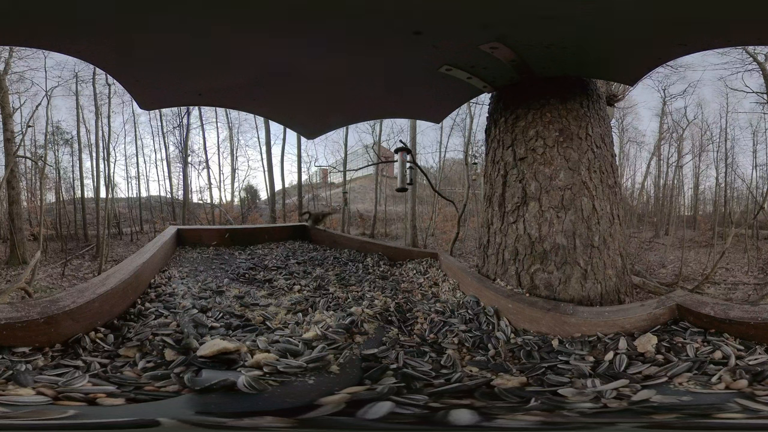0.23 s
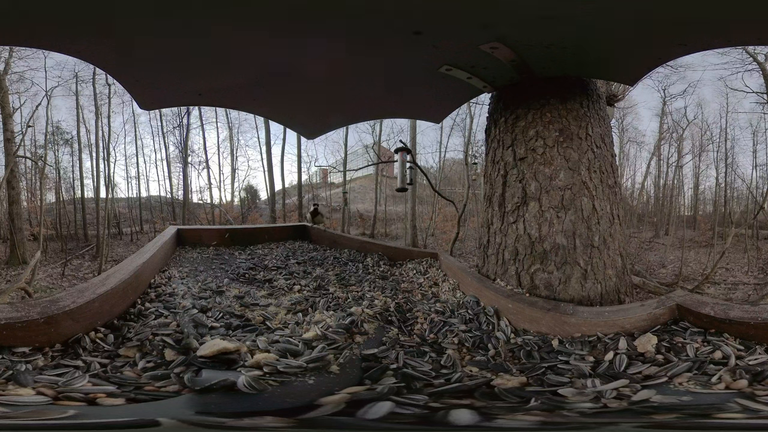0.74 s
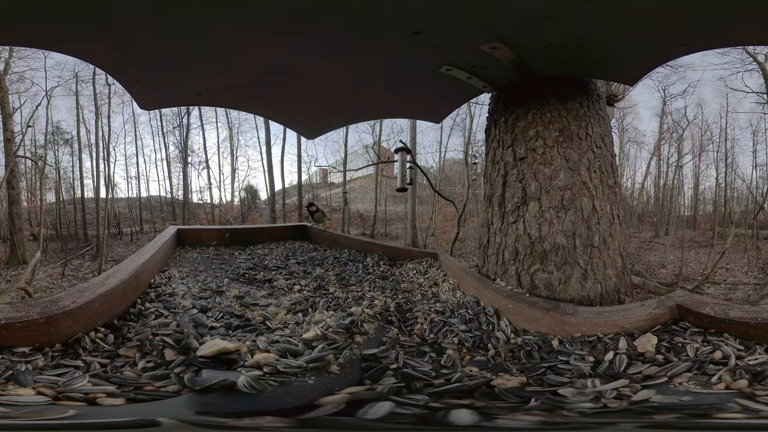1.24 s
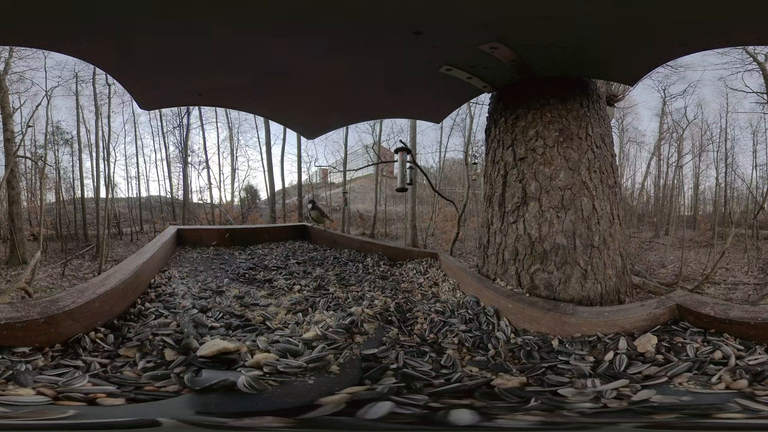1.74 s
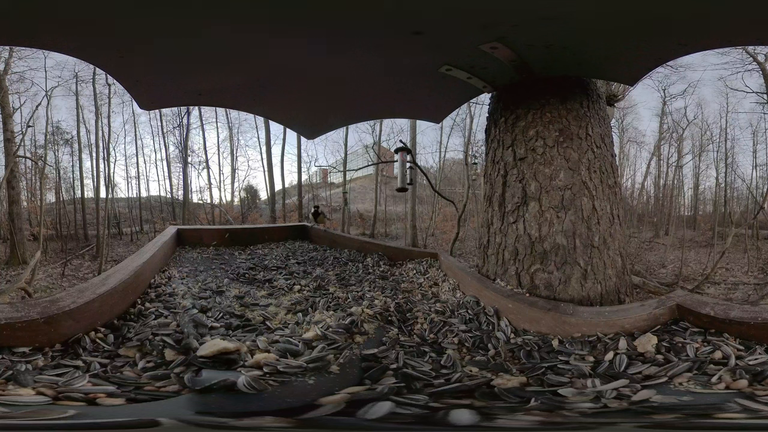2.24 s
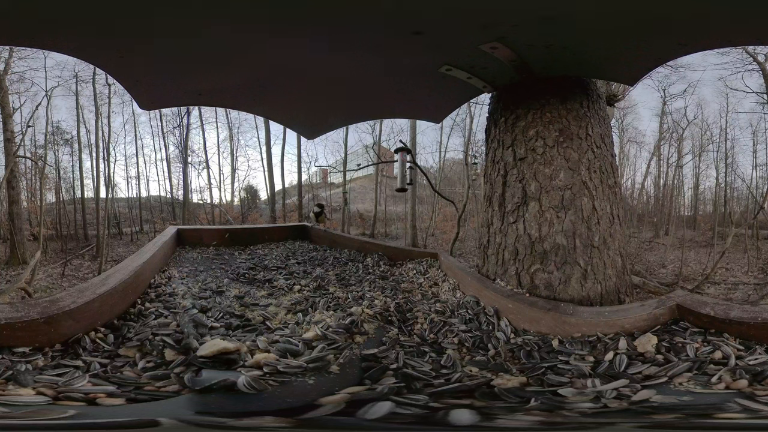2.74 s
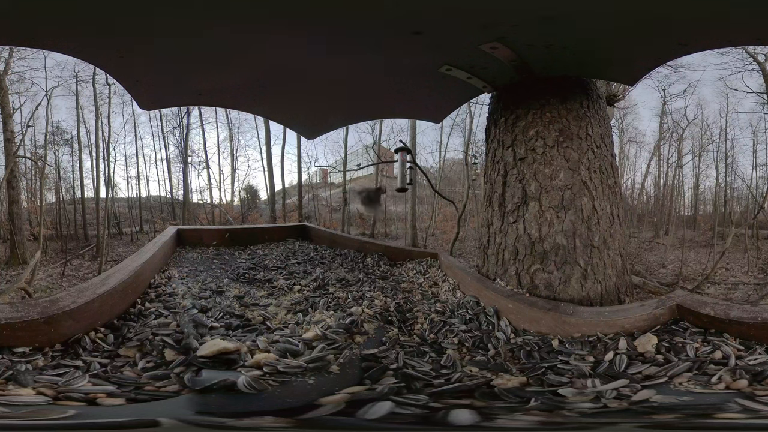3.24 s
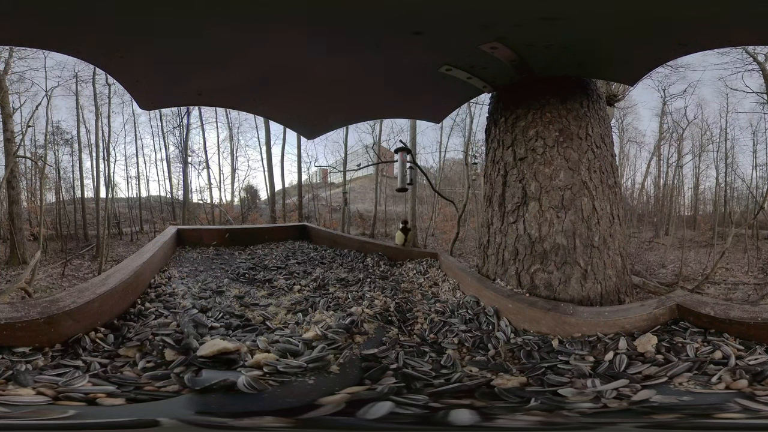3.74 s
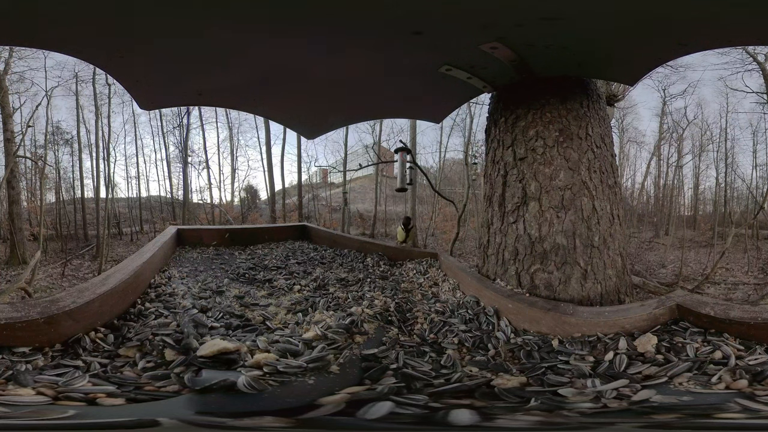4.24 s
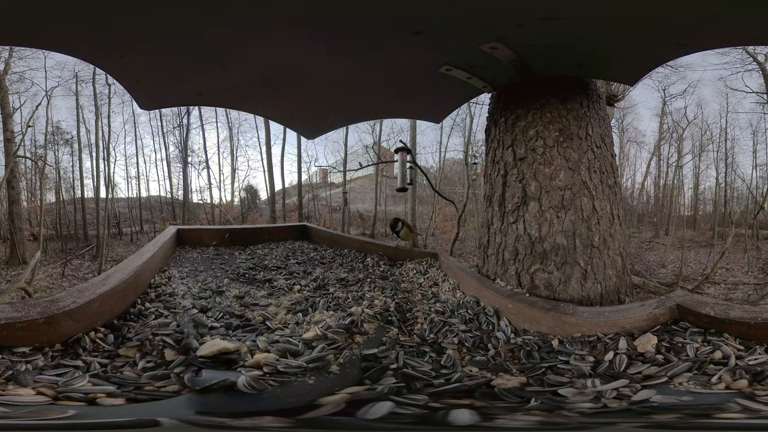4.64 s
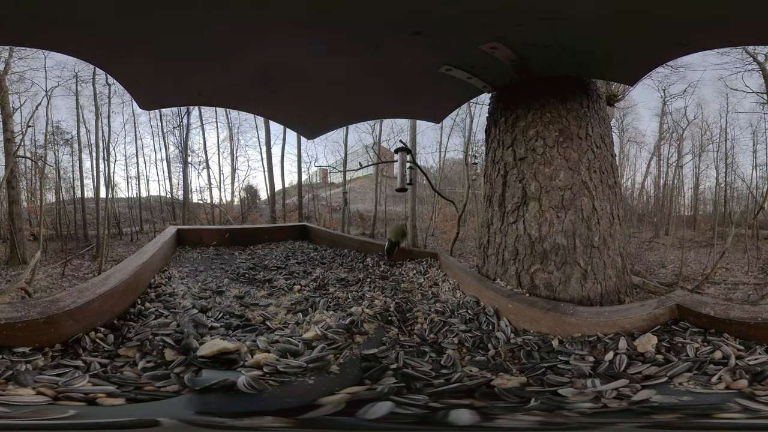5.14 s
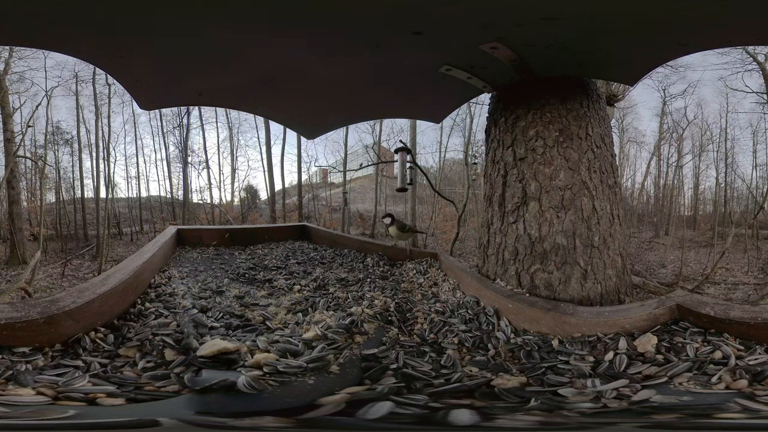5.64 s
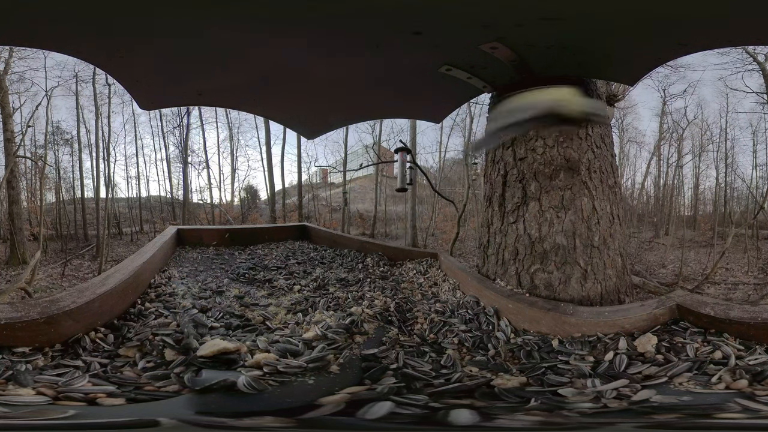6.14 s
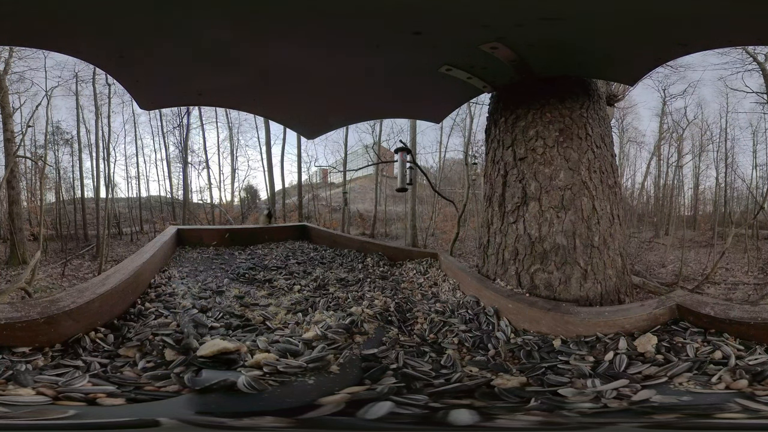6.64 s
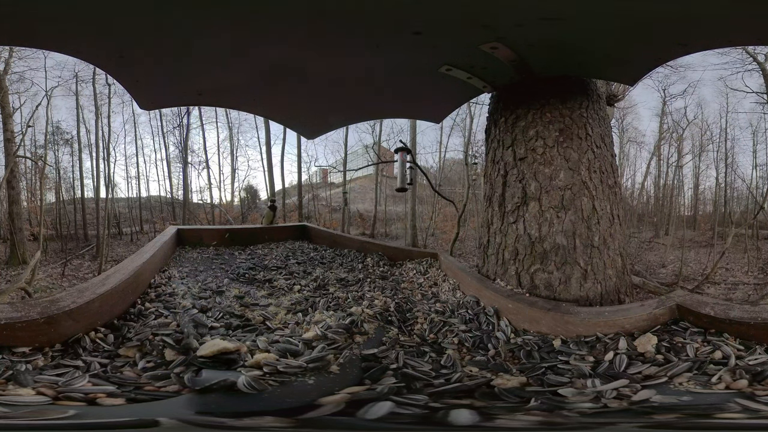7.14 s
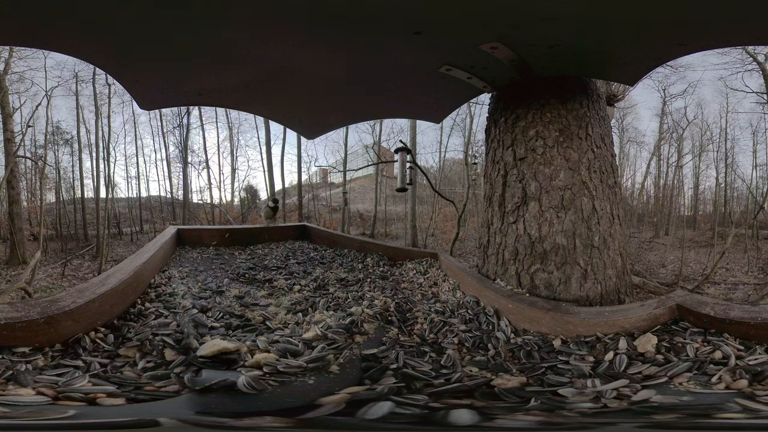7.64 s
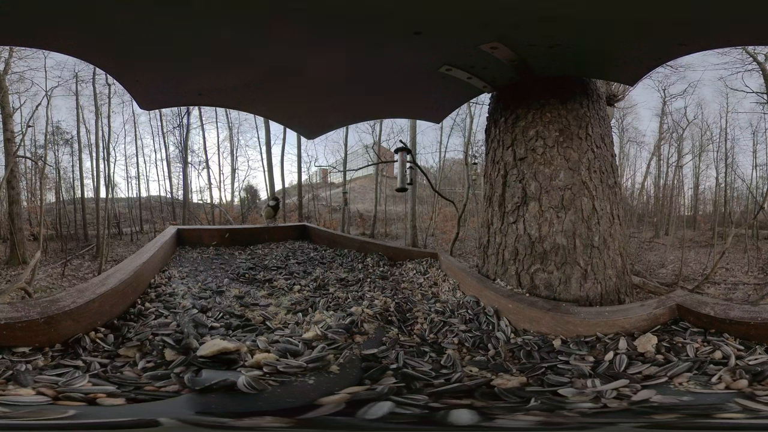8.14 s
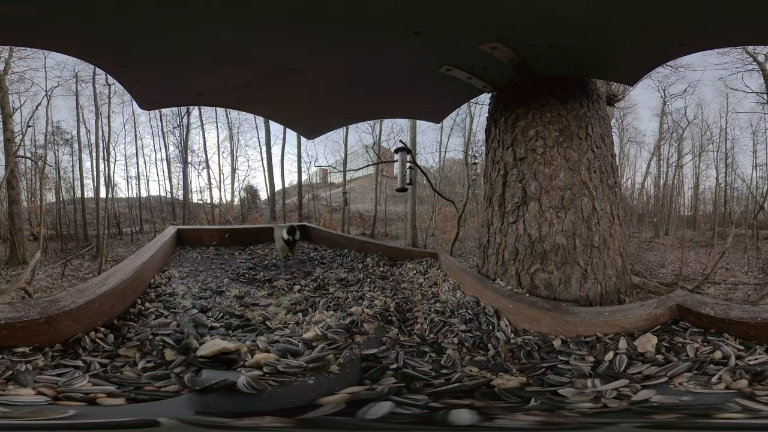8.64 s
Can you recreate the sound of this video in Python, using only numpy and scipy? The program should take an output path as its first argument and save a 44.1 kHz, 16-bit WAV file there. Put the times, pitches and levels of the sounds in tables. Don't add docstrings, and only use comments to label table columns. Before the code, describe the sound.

Small birds feed right beside a stereo microphone. Crisp seed cracks and faint high chips open the scene, with a faint rising machine whine far away. Wings flutter, buffet the microphone, and claws scrape and tap the hollow wooden rim. After another departing wing burst, a bird lands with a loud knock while tyres rumble on a distant road. The low woodland hum pumps as if gated, slightly stronger on the right.

```python
import sys
import numpy as np
from scipy import signal
from scipy.fft import rfft, irfft, next_fast_len
from scipy.io import wavfile
from scipy.ndimage import uniform_filter1d, map_coordinates

SR = 44100
rng = np.random.default_rng(int(sys.argv[2]) if len(sys.argv) > 2 else 0)


def nominal_scale(level):
    x = np.asarray(level, float) / 20
    return 10 ** x


def output_pcm(signal):
    pcm = np.clip(np.atleast_2d(signal).T, -1, 1) * 32767
    wavfile.write(sys.argv[1], SR, np.round(pcm).astype(np.int16))


N = 392490


def unit(x):
    return x / np.sqrt(np.mean(x ** 2) + 1e-20)


def along(points, hz):
    f, v = np.transpose(points)
    return np.interp(np.log(hz + 1), np.log(f + 1), v)


def curves(rows, outside=None):
    s, *cols = np.transpose(rows)
    return [np.interp(np.arange(N) / SR, s, c, outside, outside) for c in cols]


def wobble(rate_hz):
    at = np.arange(0, N + SR // rate_hz, max(SR // (8 * rate_hz), 1))
    knots = rng.standard_normal(int(N * rate_hz / SR) + 4)
    return np.interp(np.arange(N), at, map_coordinates(knots, [at * rate_hz / SR]))


def tone(hz):
    return np.sin(2 * np.pi * np.cumsum(hz) / SR)


def filtered(x, response):
    m = next_fast_len(N + 4096, real=True)
    return irfft(rfft(x, m) * response(np.fft.rfftfreq(m, 1 / SR)), m)[..., :N]


def coloured(x, spectrum, top_hz=SR / 2):
    white_gain = np.sqrt(np.mean(nominal_scale(along(spectrum, np.arange(SR // 2))) ** 2))
    return filtered(x, lambda hz: nominal_scale(along(spectrum, hz)) / white_gain * (hz < top_hz))


def rush(spectrum, alike, patchy_db):
    z = signal.stft(rng.standard_normal((2, N)), nperseg=512)[2]
    field = uniform_filter1d(rng.standard_normal(z.shape[1:]), size=6, axis=0)
    field = uniform_filter1d(field, size=10, axis=1)
    pair = signal.istft(z * nominal_scale(patchy_db * unit(field)), nperseg=512)[1][:, :N]

    def mid_side(hz):
        turn = np.arccos(np.clip(along(alike, hz), -1, 1)) / 2
        return nominal_scale(along(spectrum, hz)) * [np.cos(turn), np.sin(turn)]

    mid, side = filtered(pair, mid_side)
    return unit(np.array([mid + side, mid - side]))


def splinters(own, grain_db):
    grains = nominal_scale(grain_db * wobble(2000))
    return unit(grains * (rng.standard_normal(N) + own * rng.standard_normal((2, N))))


def add(track, s, sound):
    part = track[..., round(s * SR):][..., :sound.shape[-1]]
    part += sound[..., :part.shape[-1]]


# (fully open [s], rise [s], hold [s], hum [dB], hiss re hum [dB])
GATE = [(.13, .1, .02, -62, -9), (.152, .008, 0, -53, -12), (.301, .012, .08, -54, -13.5),
        (.517, .015, .12, -55, -14), (.728, .06, .09, -55.5, -12.5), (1.056, .008, .26, -56, -15),
        (1.507, .01, .3, -55, -15.5), (2.02, .18, .015, -54.5, -13.5), (2.279, .01, .27, -54, -13),
        (2.848, .1, .27, -66.5, -15.5), (3.117, .02, .01, -55.5, -11.5), (3.211, .05, .63, -55, -8.5),
        (3.913, .01, .16, -55.5, -14), (4.26, .15, .02, -62.5, -14), (4.586, .16, .02, -54.5, -14),
        (5.236, .03, .31, -53.5, -12.5), (5.986, .005, 0, -61, -9), (6.1, .05, .03, -63, -9),
        (6.164, .04, .08, -54, -7), (6.27, .01, .05, -54.5, -19), (6.5, .13, .07, -52, -16),
        (6.6, .01, .15, -56, -17), (6.763, .01, 2.2, -52.5, -13.8), (8.774, .05, .01, -56, 1)]
SAG_DB_PER_S, RELEASE_DB_PER_S = 2.5, 95


def gate(shut_db, under):
    t, level = np.arange(0, N, 32) / SR, shut_db
    for s, rise, hold, db, hiss_db in GATE:
        top = db + under * hiss_db
        rising = top - (top - shut_db) * (s - t) / max(rise, .002)
        falling = top - SAG_DB_PER_S * (t - s) - RELEASE_DB_PER_S * np.clip(t - s - hold, 0, None)
        level = np.maximum(level, np.where(t < s, rising, falling))
    return np.interp(np.arange(N) / SR, t, level)


# (time [s], level [dB])
CAR = [(6.75, 0), (6.77, 8), (6.86, 4), (7.07, 6.5), (7.23, 4), (7.42, 2), (7.67, 6.5), (7.8, 3),
       (8.13, 7.5), (8.38, 6), (8.52, 1), (8.66, 6)]


def hum_level_db():
    return gate(shut_db=-70, under=0) + curves(CAR)[0]


# (frequency [Hz], correlation [0-1])
ALIKE = [(60, 0.55), (150, 0.29), (380, 0.62), (950, 0.79), (2380, 0.15), (5980, 0.73), (15000, 0.94)]
# (frequency [Hz], level [dB per Hz])
HISS = [(3200, -49.5), (5500, -18.5), (7500, -12.5), (9300, -0.5), (11500, 0.5), (13700, -2), (15800, -6),
        (16200, -7)]


def hiss():
    level_db = gate(shut_db=-86, under=1) + .6 + .9 * wobble(90)
    return nominal_scale(level_db) * rush(HISS, ALIKE, patchy_db=1.1)


def car_nearness():
    from_s, full_s = 6.48, 6.99
    return np.clip((np.arange(N) / SR - from_s) / (full_s - from_s), 0, 1)


# (frequency [Hz], level [dB per Hz])
RUMBLE = [(12, -40.5), (20, -14.5), (35, -6), (48, 3), (120, -5.5), (160, -36), (260, -120)]


def rumble():
    level_db = hum_level_db() + 1.1 - 3.7 * car_nearness() + 2.4 * wobble(6.7)
    return nominal_scale(level_db) * rush(RUMBLE, [(30, 0.32)], patchy_db=-0.1)


# (time [s], frequency [Hz], level [dB])
WHINE = [(1.0, 1440, -99), (1.6, 1486, -90), (2.2, 1552, -89), (3.1, 1610, -89), (3.3, 1620, -110)]


def whine():
    hz, db = curves(WHINE, outside=-120)
    return nominal_scale(db + hum_level_db() + 68) * tone(hz)


# (frequency [Hz], level [dB per Hz])
HUM = [(65, -40), (110, -5.5), (250, 0.5), (456, -4), (1040, -12), (1890, -24), (4020, -32), (4830, -37),
       (5340, -44), (6000, -43), (7800, -53), (13200, -120)]
# (frequency [Hz], level [dB per Hz])
TYRES = [(65, -25), (110, 1.5), (139, -7.5), (222, -3), (337, -1.5), (472, -8), (729, -4.5), (900, -8.5),
         (1470, -12.5), (2400, -21), (3800, -30), (4800, -38.5), (6000, -48.5), (7800, -76), (13200, -120)]


def hum_and_tyres():
    car = car_nearness()
    woods = np.sqrt(1 - car) * rush(HUM, ALIKE, patchy_db=2.5)
    roar = np.sqrt(car) * rush(TYRES, ALIKE, patchy_db=1.6)
    return nominal_scale(hum_level_db() + 3.0 + .7 * wobble(23)) * (woods + roar)


# (time [s], firing frequency [Hz], level [dB])
ENGINE = [(6.4, 67.4, -64), (6.55, 69.1, -49), (6.7, 69.2, -64), (6.8, 69.3, -56), (6.98, 69.4, -60),
          (7.05, 77.3, -64), (7.23, 68.6, -53.5), (8.9, 67.9, -55.5)]


def engine():
    hz, db = curves(ENGINE, outside=-120)
    return nominal_scale(db + 4.0 + 3.2 * wobble(13)) * tone(hz * (1 + .04 * wobble(12)))


# (time [s], length [s], start [Hz], end [Hz], level [dB])
CHIPS = [
    (0.706, 0.018, 6600, 6100, -63),
    (.729, 0.018, 5650, 5100, -65),
    (1.7, .065, 4480, 4570, -78),
    (1.745, .085, 4570, 4470, -78),
    (1.94, 0.12, 4530, 4400, -78),
    (4.611, 0.019, 3870, 3850, -68),
    (4.628, 0.01, 3830, 1800, -65),
]


def far_birds():
    out = np.zeros(N)
    blur = 1 + .007 * wobble(150)
    for s, length, start_hz, end_hz, db in CHIPS:
        u = np.linspace(0, 1, round(length * SR))
        hz = (start_hz + (end_hz - start_hz) * u) * blur[round(s * SR):][:len(u)]
        add(out, s, nominal_scale(db + 7.5) * np.sin(np.pi * u) ** 2 * tone(hz))
    decay_s = .025
    echo = np.exp(-np.arange(SR // 10) / (decay_s * SR)) * rng.standard_normal(SR // 10)
    wet = signal.fftconvolve(out, echo / np.linalg.norm(echo))[:N]
    return out * nominal_scale(3 * wobble(90)) + nominal_scale(-13.0) * wet


EXPOSURE = nominal_scale([[-1.5], [1.5]])
# (peak time [s], peak level [dB], 20 dB swell [s], 20 dB fade [s])
GUSTS = [
    (3.32, -21, .032, .04),
    (3.39, -38, .2, .07),
    (3.487, -41, .02, .04),
    (3.53, -31, .022, .1),
    (3.68, -32, .085, .07),
    (5.395, -41, .04, .06),
    (6.15, -37, .022, .025),
    (6.216, -25, .028, .045),
]
# (frequency [Hz], level [dB per Hz])
BUFFET = [(15, -34.5), (30, -4), (65, 1.5), (150, -8), (300, -7.5), (600, -16.5), (1200, -32),
          (2500, -39.5), (5000, -76)]


def downwash():
    now = np.arange(N) / SR
    level_db = np.max([db - 20 * np.where(now < s, (s - now) / swell, (now - s) / fade)
                       for s, db, swell, fade in GUSTS], axis=0)
    wash = uniform_filter1d(nominal_scale(level_db - 3.5), size=400)
    swirl = rush(BUFFET, [(30, .9)], patchy_db=3.2)
    steady = swirl / np.sqrt(np.abs(uniform_filter1d(swirl ** 2, size=1300)) + .05)
    return wash * nominal_scale(1.7 * wobble(120)) * steady * EXPOSURE


# (suction time [s], peak level [dB], frequency [Hz])
PUFFS = [(.147, -49, 220), (.327, -46, 90), (2.4716, -39, 190), (2.4857, -43, 80), (2.513, -43, 230),
         (3.294, -35, 70), (3.3095, -37, 90), (3.3172, -21, 120), (3.330, -27, 85), (3.3375, -31, 220),
         (3.3464, -32, 75), (3.3914, -36, 66), (3.5346, -28, 135), (3.5467, -33, 80), (3.5756, -37, 70),
         (3.6405, -37, 60), (3.6695, -28, 140), (3.6832, -32, 70), (3.7086, -37, 45), (5.3884, -43, 50),
         (5.4045, -43, 55), (5.4183, -43, 60), (6.1418, -37, 80), (6.1545, -40, 60), (6.1906, -29, 65),
         (6.2047, -30, 75), (6.2127, -32, 100), (6.2204, -23, 170), (6.2341, -35, 80), (6.2451, -35, 75),
         (8.78, -43, 255)]
# (time [s], clap level [dB], air push level [dB])
CLAPS = [
    (2.278, -49, -50),
    (2.3165, -47, -40),
    (2.359, -52, -55),
    (2.3962, -43, -42),
    (2.4365, -50, -36),
    (2.479, -48, -42),
    (2.520, -52, -52),
    (2.553, -58, -46),
]


def wing_strokes():
    air, t = np.zeros(N), np.arange(-SR // 40, SR // 40) / SR
    for s, db, hz in PUFFS:
        pulse = np.cos(2 * np.pi * hz * t) * np.exp(-(hz * t / 0.38) ** 2)
        add(air, s + t[0], -nominal_scale(db + 3.5) * pulse)
    push_hz = 260
    for s, _, push_db in CLAPS:
        pulse = np.cos(2 * np.pi * push_hz * t + .6) * np.exp(-(push_hz * t / .4) ** 2)
        add(air, s + t[0], nominal_scale(push_db + 3.5) * pulse)
    return air * EXPOSURE


# (time [s], length [s], level [dB], dull part re bright [dB])
SCRAPES = [(3.19, .02, -48, -3), (3.199, 0.062, -35, -1.5), (3.255, 0.031, -45.5, 0), (3.28, 0.02, -42, -6),
           (3.286, .03, -39, -8), (3.302, 0.04, -31, -1), (3.327, 0.087, -46.5, -2.5),
           (3.412, 0.023, -46, 0), (3.497, 0.084, -48.5, 6), (3.54, .02, -57, 10), (3.636, 0.028, -50, 6),
           (3.682, 0.02, -48, 3), (3.78, 0.038, -49.5, 5), (4.036, .04, -58, 2), (5.23, 0.047, -54, 5),
           (5.27, 0.016, -46, -2), (5.29, .013, -45, -4), (5.334, 0.035, -49.5, 2), (5.362, .03, -53, -2),
           (6.138, 0.028, -51, 1), (6.185, 0.025, -46.5, 3.5), (6.195, 0.098, -51.5, 1),
           (6.776, 0.061, -50, -7), (8.583, 0.01, -57, -1), (8.625, .04, -59, -3), (8.696, 0.014, -50, -2),
           (8.757, 0.044, -38, -3), (8.763, 0.011, -33.5, -9), (8.778, 0.0053, -35, -7),
           (8.819, 0.014, -42, 2.5), (8.835, 0.023, -48.5, -1)]
# (frequency [Hz], level [dB per Hz])
SNAP = [(4000, -49), (6300, -32.5), (8300, -10), (9600, -4.5), (11800, 1), (13500, -3), (15300, -5),
        (16000, -9), (17000, -20)]
# (frequency [Hz], level [dB per Hz])
RASP = [(200, -31.5), (450, -3.5), (850, -1), (1600, -5.5), (3500, -10), (5300, -19), (7500, -29),
        (9000, -60.5)]


def scrapes():
    bright, dull = np.zeros(N), np.zeros(N)
    for s, length, db, dull_db in SCRAPES:
        u = np.linspace(0, 1, round(length * SR))
        drag = nominal_scale(db + 0.12 - 3.5 * u) * np.abs(np.sin(np.pi * u ** 0.7)) ** 0.75
        add(bright, s, drag)
        add(dull, s, nominal_scale(dull_db - 6.0) * drag)
    bits = nominal_scale(2.6 * wobble(160)) * splinters(own=1.0, grain_db=3.2)
    return coloured(bright * bits, SNAP, top_hz=15900) + coloured(dull * bits, RASP)


# (time [s], peak level [dB], board mode [Hz], edge re board [dB], edge mode [Hz])
KNOCKS = [(.2887, -52, 1000, -8, 1900), (.3062, -56, 1100, 11, 1550), (.3275, -48, 900, 9, 1540),
          (.7994, -50, 1120, 8, 1560), (2.397, -47, 1120, -4, 1610), (3.1282, -48, 1120, 4.5, 1610),
          (3.238, -36, 1120, 1, 1750), (3.299, -39, 1120, 3, 1640), (3.315, -25, 1120, 0, 1660),
          (3.7724, -48, 1120, 1, 1610), (3.7884, -30, 1120, -4, 1610), (3.9566, -38.5, 1120, .5, 1610),
          (4.0457, -51, 1120, 2.5, 1610), (4.5461, -44, 1120, .5, 1610), (4.5642, -46, 1120, -5, 1610),
          (5.235, -40, 1070, -2, 1800), (5.245, -37.5, 1100, -12, 1610), (5.252, -48, 1100, 8, 1660),
          (5.276, -42, 900, -5, 1610), (5.292, -47, 1000, 9, 1630), (5.318, -35, 950, -9, 2900),
          (5.338, -39.5, 800, 0, 1620), (5.348, -52, 800, 9, 1620), (5.361, -48, 800, 4, 1600),
          (5.378, -42, 1080, -10, 1610), (5.404, -40, 1250, -3, 2000), (5.5084, -50, 1120, 6, 1610),
          (5.5672, -43.5, 1120, -1.5, 1610), (6.1464, -49, 950, 8.5, 1620), (6.1895, -37, 1120, 0, 1580),
          (6.2035, -44, 1120, 3, 2200), (6.7614, -22, 1170, -7, 1680), (6.778, -40, 1120, -9, 1610),
          (6.8152, -39, 1120, -7, 1610), (6.9114, -37, 1120, -14, 1610), (7.6964, -37, 1120, -8.5, 1610),
          (8.768, -46, 600, -1, 1610)]
# (frequency [Hz], width [Hz], level [dB])
RIM = [(580, 100, -27), (2200, 220, -10.5), (3700, 360, -14)]
BOARD_WIDTH_HZ, EDGE_WIDTH_HZ = 95, 90


def rim():
    out, t = np.zeros(N), np.arange(SR // 30) / SR
    chance = rng.standard_normal((len(KNOCKS), len(RIM)))
    for (s, db, board_hz, edge_db, edge_hz), sizes in zip(KNOCKS, chance):
        modes = [(board_hz, BOARD_WIDTH_HZ, 0), (edge_hz, EDGE_WIDTH_HZ, edge_db)]
        modes += [(hz, width, level + 3.0 * size) for (hz, width, level), size in zip(RIM, sizes)]
        ring = sum(nominal_scale(level) * np.exp(-np.pi * width * t) * np.sin(2 * np.pi * hz * t)
                   for hz, width, level in modes)
        add(out, s, nominal_scale(db - 1.5) * ring * (1 - np.exp(-t / 0.0009)))
    return out


# (time [s], peak level [dB], dull part re bright [dB])
CRACKS = [(.1506, -48, -13), (.3017, -50.5, -7), (.5095, -44, -16), (.5147, -38.5, -19.5),
          (.5611, -44.5, -15), (.631, -47, -20), (.6354, -44.5, -16), (1.054, -43, -13.5),
          (1.0992, -42.5, -13), (1.1528, -42, -14.5), (1.2408, -41, -12), (1.505, -31.5, -10),
          (1.9974, -49.5, -10.5), (4.5037, -50.5, -18.5), (4.5446, -51, -11), (4.563, -50.5, -6.5),
          (5.5084, -48.5, -12), (5.5366, -40, -15.5), (5.5667, -48, -23), (5.5764, -53, -16),
          (6.914, -43.5, -23), (6.986, -47, -18), (7.0374, -47, -15), (7.2144, -52, -14),
          (7.6365, -44.5, -23), (7.6655, -52, -18), (7.6959, -42.5, -13.5), (7.7089, -36, -23),
          (8.4183, -52, -11), (8.6512, -44, -19),
          (.1116, -55.5, -12), (3.1158, -56, -14), (3.1286, -50, -23), (3.416, -42, -18), (3.4322, -12, -35),
         (3.5892, -44.5, -14), (3.7225, -39.5, -16), (3.7913, -33.5, -27), (3.8397, -40, -21),
         (3.925, -44.5, -20), (3.9582, -40, -18), (4.0105, -42.5, -18), (4.0244, -43, -15),
         (4.049, -43.5, -22.5), (5.235, -49, -16), (5.252, -36.5, -21), (5.2774, -37, -26),
         (5.3186, -33.5, -16.5), (5.4036, -41, -17), (5.9838, -51, -18), (6.0816, -56, -23),
         (6.097, -49, -22), (6.1479, -37, -24), (6.4994, -51, -12), (6.7625, -33, -17)]
# (frequency [Hz], level [dB per Hz])
SHELL = [(900, -42.5), (1500, -6.5), (2500, -2), (3600, 1), (5000, -8.5), (7000, -15), (9000, -62)]
CRACK_T60_S, SHORTER_S_PER_DB = .02, .0004


def husks():
    bright, dull, t = np.zeros(N), np.zeros(N), np.arange(SR // 10) / SR
    clap_dull_db = -12
    flaps = [(s, db - 2.5, clap_dull_db) for s, db, _ in CLAPS]
    for s, db, dull_db in CRACKS + flaps:
        t60 = CRACK_T60_S - SHORTER_S_PER_DB * (db + 45)
        burst = nominal_scale(db - 60 * t / max(t60, .004)) * (1 - np.exp(-t / .0008))
        add(bright, s, burst)
        add(dull, s, nominal_scale(dull_db) * burst)
    bits = splinters(own=.9, grain_db=2.5)
    snap = coloured(bright * bits, SNAP, top_hz=16800)
    return nominal_scale(-.8) * snap + nominal_scale(6.0) * coloured(dull * bits, SHELL)


def scene():
    background = hiss() + rumble() + whine() + hum_and_tyres() + engine() + far_birds()
    return background + downwash() + wing_strokes() + scrapes() + rim() + husks()


def band_limit(x):
    return signal.sosfilt(signal.butter(12, 15850, fs=SR, output="sos"), x)


# (frequency [Hz], left re right [dB])
LEAN = [(60, -9.0), (180, -5), (550, -3.5), (1650, -6.0), (4970, -4.5), (15000, -7)]
# (frequency [Hz], left phase lead [rad])
LEAD = [(0, 0), (1810, 0.09), (4820, 2), (5680, 1.3), (6290, -2), (15800, 1), (16400, 3), (16600, 0.5)]


def record(dry):
    half = np.array([[.5], [-.5]])

    def ports(hz):
        return nominal_scale(along(LEAN, hz) * half - 0.59) * np.exp(1j * along(LEAD, hz) * half)

    return band_limit(filtered(dry, ports))


dry = scene()
out = record(dry)
output_pcm(out)
```